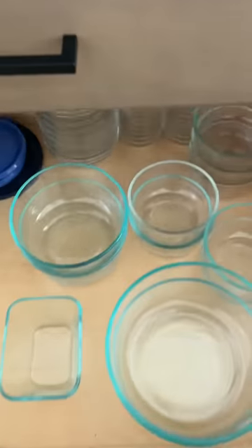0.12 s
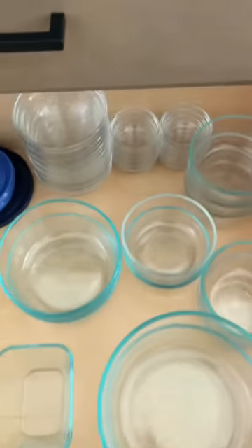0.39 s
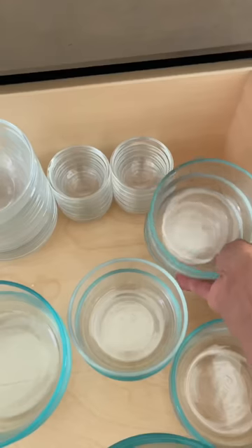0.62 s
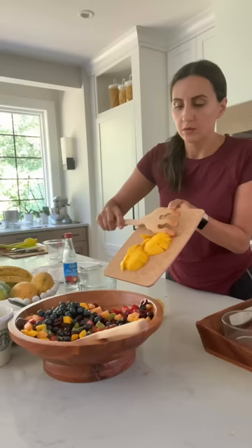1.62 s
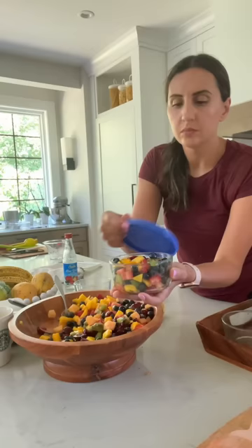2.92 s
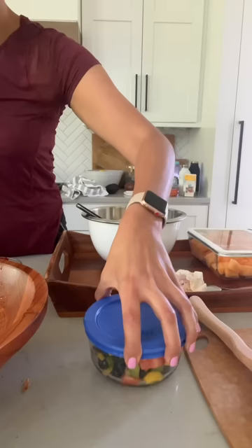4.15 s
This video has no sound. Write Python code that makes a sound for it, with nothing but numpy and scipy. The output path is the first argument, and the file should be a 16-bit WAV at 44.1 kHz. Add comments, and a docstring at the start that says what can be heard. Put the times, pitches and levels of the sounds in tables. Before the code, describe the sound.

A wooden drawer rolls and judders open with glass bowls clinking inside, food is poured and stirred in a bowl, then a plastic lid snaps shut.

```python
"""Kitchen drawer, bowl and lid

A kitchen heard on a phone with two microphone ports, in short takes butted together over appliance hum.
A wooden drawer rolls further off; then one is pulled, its box judders and glass bowls ring in it.
Food, made of dense noise grains, is poured into a bowl and stirred; single taps ring the full bowl.
A plastic lid snaps shut catch by catch on a hard counter, from short noise bursts into resonances.
Knocks, food and snaps excite a noise-built room tail, cut where the next take begins."""
import sys
import numpy as np
from scipy import signal
from scipy.fft import rfft, irfft
from scipy.io import wavfile

SR = 44100
rng = np.random.default_rng(int(sys.argv[2]) if len(sys.argv) > 2 else 0)


def level_to_linear(level):
    """Convert decibel levels to linear amplitude factors, elementwise."""
    exponent = np.asarray(level, float) / 20
    return 10 ** exponent


def dump_mix(stems):
    """Bounce the given channels to the path in sys.argv[1] as a 16-bit WAV at rate SR."""
    frames = np.atleast_2d(stems).T  # one column per channel
    limited = np.clip(frames, -1, 1)  # hard clip at full scale
    pcm = np.round(limited * 32767).astype(np.int16)
    wavfile.write(sys.argv[1], SR, pcm)


N = 255339
T = np.arange(N) / SR
# where one take ends and the next begins: t/s
TAKE_EDGES = [0, .541, 1.631, 2.131, 2.74, 4.184, 4.712, 5.237, 5.737, 5.79]


def level(x, db):
    """Scale to an rms level."""
    return x * level_to_linear(db) / np.sqrt(np.mean(x ** 2))


def gain(shape, lo_hz, hi_hz, size):
    """Gain per frequency bin from (f/Hz, level/dB) points, kept between two edges."""
    f = np.maximum(np.fft.rfftfreq(size, 1 / SR), 1)
    hz, db = np.transpose(shape)
    curve = level_to_linear(np.interp(np.log(f), np.log(hz), db))
    return curve / (1 + (lo_hz / f) ** 8) / (1 + (f / hi_hz) ** 8)


def noise(shape, lo_hz=20, hi_hz=17000, size=N):
    """Noise of unit rms with a given spectrum."""
    spectrum = rfft(rng.standard_normal(size)) * gain(shape, lo_hz, hi_hz, size)
    return level(irfft(spectrum, size), 0)


def ring(x, modes):
    """Sum of decaying resonances (f/Hz, level/dB, t60/s) driven by x."""
    out = 0
    for hz, db, t60 in modes:
        pole = np.exp(2j * np.pi * hz / SR - np.log(1000) / (max(t60, .004) * SR))
        out = out + level_to_linear(db) * signal.lfilter([1], [1, -pole], x).imag
    return out


def curves(rows):
    """Columns of (t/s, ..) rows over time, and a gate that is open inside the table."""
    s, *cols = np.transpose(rows)
    gate = (T >= s[0]) * (T < s[-1])
    return [np.interp(T, s, c) for c in cols] + [gate]


def grains(rate, spread_db, ms):
    """Random contacts, rate per second, with a heavy tail of sizes: an envelope of unit rms."""
    hits = (rng.random(N) < rate / SR) * level_to_linear(spread_db * rng.exponential(size=N))
    return level(signal.lfilter([1], [1, -np.exp(-1000 / (ms * SR))], hits), 0)


def burst(ms, rise_ms, size=8192):
    """Contact envelope: quick rise, exponential fall."""
    t = np.arange(size) / SR * 1000
    return (1 - np.exp(-t / rise_ms)) * np.exp(-t / ms)


def white_hit(ms, rise_ms):
    """White noise in a contact envelope, to drive resonances."""
    return rng.standard_normal(8192) * burst(ms, rise_ms)


def colour_hit(shape, ms, rise_ms, lo_hz=20, hi_hz=17000):
    """Coloured noise in a contact envelope, heard directly."""
    return noise(shape, lo_hz, hi_hz, size=8192) * burst(ms, rise_ms)


def pan(db):
    """Left and right gains, db apart; positive leans left."""
    return level_to_linear(np.array([[db], [-db]]) / 2)


def add(out, s, x, db, pan_db=0):
    """Place a sound whose first 20 ms have the given rms."""
    i = int(s * SR)
    x = (x * level_to_linear(db) / np.sqrt(np.mean(x[:882] ** 2)))[:N - i]
    out[:, i:i + len(x)] += x * pan(pan_db)


# room air of the earlier and the later takes: f/Hz, relative level/dB
EARLY_AIR = [(15, -57), (25, -21), (49, 0.5), (157, -3.5), (242, -13), (270, -5.5), (363, -26), (575, -15),
             (1130, -43.5), (1330, -43.5), (2690, -45), (6560, -41), (9840, -58.5), (13200, -40.5),
             (16000, -41.5)]
LATE_AIR = [(15, -59.5), (25, -42), (42, -17.5), (108, -20.5), (145, -13), (270, -24), (301, -25.5),
            (427, -25.5), (591, -40.5), (775, -36), (936, -52), (6050, -61.5), (9070, -72.5), (14400, -61),
            (16000, -85.5)]
# appliance hum of the earlier and the later takes: f/Hz, level/dB rms, width/Hz
EARLY_HUM = [(60.5, -59.5, 14), (114.4, -67, 14), (272.96, -62.5, 18)]
LATE_HUM = [(55.9, -53.5, 7.9), (261.2, -63, 19)]


def background(shape, air_db, lines):
    """Room air, with treble that differs between the sides, and hum lines of narrow wavering noise."""
    hum = 0
    for hz, db, width in lines:
        hum = hum + level(ring(rng.standard_normal(N), [(hz, 0, 2.2 / width)]), db)
    side = level_to_linear(air_db - 7) * noise(shape, 270) * np.array([[1], [-1]])
    return level_to_linear(air_db) * noise(shape) + hum + side


def appliance_tone():
    """A steady appliance tone of one sine whose strength wavers a little."""
    hz, db, waver_share = 106, -53, 0.18
    waver = 1 + waver_share * noise([(1, 0.01), (60, 0.000042)], 2, 20)
    return level_to_linear(db) * np.sqrt(2) * waver * np.sin(2 * np.pi * hz * T)


# decay of the kitchen: f/Hz, t60/s
ROOM_DECAY = [(100, 0.23), (300, 0.3), (1000, 0.911), (2000, 0.45), (4000, 0.45), (8000, 0.24),
              (15000, 0.17)]
# colour of the room tail: f/Hz, relative level/dB
ROOM_COLOUR = [(60, 1), (300, 3.5), (800, -2), (2000, 1), (5000, -2), (12000, -5)]
ROOM_ALIKE_HZ = 700  # well below this both sides hear nearly the same tail


def room():
    """Left and right tails of a hard kitchen: decaying noise bands, the top treble shortest."""
    t, out = np.arange(SR // 2) / SR, 0
    decay_hz, decay_s = np.transpose(ROOM_DECAY)
    colour_hz, colour_db = np.transpose(ROOM_COLOUR)
    flat = [(20, 0), (20000, 0)]
    for hz in 60 * 2 ** np.arange(0, 8.1, .5):
        t60 = np.interp(np.log(hz), np.log(decay_hz), decay_s)
        db = np.interp(np.log(hz), np.log(colour_hz), colour_db)
        mid, side = (noise(flat, hz / 2 ** .3, hz * 2 ** .3, size=len(t)) for _ in range(2))
        width = min(hz / ROOM_ALIKE_HZ, 1.3)
        band = (mid + side * width * np.array([[1], [-1]])) * 10 ** (-3 * t / t60)
        out = out + level_to_linear(db) * band * np.sqrt(hz / t60)
    out = out * np.clip((t - .004) / 0.0096, 0, 1)  # the first walls answer after a few ms
    return out / np.sqrt(np.sum(out ** 2) / 2)


# colour of the tail of a clack: f/Hz, relative level/dB
CLACK_COLOUR = [(530, -56), (900, -14.5), (1020, -10.5), (1150, -19), (1220, -12), (1390, 3), (1520, -14),
                (1860, -3.5), (1980, -7.5), (2050, -14), (2680, -19), (3100, -26.5), (4000, -21.5),
                (5200, -67), (8800, -120)]


def clack_tail():
    """The room tail alone of a clack just before a cut: noise independent on the two sides."""
    db, t60 = -53, 0.659
    start, end = TAKE_EDGES[3], TAKE_EDGES[4]
    both = np.array([noise(CLACK_COLOUR, 963, 3340) for _ in range(2)])
    gate = (T >= start) * (T < end)
    return level_to_linear(db) * both * gate * 10 ** (-3 * np.abs(T - start) / t60)


# the far drawer, for its rumble and its hiss: level at the start/dB, slows from t/s, fall after it/dB per s
FAR_ROLL = dict(rumble=(-45, 0.153, 20.4), hiss=(-55, 0.123, 35.5))
# colour of the far drawer: f/Hz, relative level/dB
FAR_ROLL_COLOUR = [(24, -34), (40, -7), (211, -0.5), (401, -2), (582, -12), (659, -5), (1060, -16),
                   (1460, -14), (3830, -34), (4910, -34.5), (5850, -46.5), (8070, -40), (10100, -59.5),
                   (12300, -42.5), (15000, -71.5)]


def far_drawer():
    """A drawer rolling further off, then slowing: rumble and hiss that fade at their own rates."""
    fades = {}
    for part, (db, s, rate) in FAR_ROLL.items():
        fades[part] = (T < TAKE_EDGES[1]) * level_to_linear(db - rate * np.maximum(T - s, 0))
    rumble = fades["rumble"] * noise(FAR_ROLL_COLOUR, 34.9, 997)
    return rumble + fades["hiss"] * noise(FAR_ROLL_COLOUR, 732)


# food poured into the bowl: t/s, flow level/dB before the rub's trim, hiss over the flow/dB
POUR_FLOW = [(1.631, -50, -16.5), (1.635, -51, -14.5), (1.755, -51, 7), (1.935, -45.5, -5),
             (1.951, -36.5, -7), (1.973, -49, -11), (2.029, -52.5, -1.65), (2.1, -74.5, 3),
             (2.131, -85, 5.5)]
# spoon through the food: peak t/s, level/dB before the rub's trim, time to fall 20 dB/s,
# hiss over it/dB, top over it/dB
SPOON_STROKES = [(2.75, -66.5, 0.0748, 1, -2), (2.81, -75, 0.02, -9.5, 5), (2.956, -55.5, 0.0073, 9, -11.5),
                 (2.998, -44.5, 0.0891, -7.5, -30), (3.13, -64.5, 0.3259, -4.5, -11.5),
                 (3.19, -47, 0.1494, -7.5, -16.5), (3.407, -73.5, 0.1072, 4, 6.5),
                 (3.56, -78, .12, 0.37, 7.5), (3.697, -66.5, 0.136, -12.5, -2),
                 (3.834, -72, 0.03, -11.5, -15), (3.903, -54.5, 0.0113, -15, -4.5),
                 (4.1, -74.5, 0.68, -3, -14)]


def pour_and_strokes():
    """Low, hiss and top gains of the pour and of every spoon stroke, which swells faster than it fades."""
    top_over_hiss_db, rise_share = -8.5, 0.288  # rise time as a share of the fall
    flow, bright, gate = curves(POUR_FLOW)
    out = gate * level_to_linear(np.array([flow, flow + bright, flow + bright + top_over_hiss_db]))
    stirring = (T >= TAKE_EDGES[4]) * (T < TAKE_EDGES[5])
    for s, db, fall, hiss, top in SPOON_STROKES:
        shape = db - 20 * np.maximum(T - s, (s - T) / rise_share) / fall
        out = out + stirring * level_to_linear(shape + np.array([[0], [hiss], [top]]))
    return out


# colour of damp food and of its taps: f/Hz, relative level/dB
FOOD_COLOUR = [(240, -35), (400, 3.5), (505, -8.5), (590, -3), (744, -7), (817, -5.5), (1240, -12),
               (1380, -11), (3150, -13), (3680, -7.5), (4040, -13), (6440, -11), (9200, -36.5),
               (14200, -14.5), (16300, -30.5)]


def food_rub():
    """Damp pieces rub and tumble: dense contact grains roughen three bands of noise."""
    low, hiss, top = pour_and_strokes()
    rub = level(1 + 0.275 * grains(220, 4, 1.7), -6.0)
    body = low * noise(FOOD_COLOUR, 471, 2510)
    return rub * (body + hiss * noise(FOOD_COLOUR, 2240, 9330) + top * noise(FOOD_COLOUR, 10000))


# pieces and spoon tapping the bowl: t/s, low, middle and high level/dB before trims, tink f/Hz
BOWL_TAPS = [(1.7035, -77.5, -54, -54, 6040), (1.7894, -66, -51.5, -48.5, 3600),
             (1.951, -55.5, -47, -50.5, 5582), (2.7487, -66, -66.5, -68, 3420),
             (2.7686, -55.5, -75, -65.5, 5100), (2.9238, -65, -72, -79, 4860),
             (2.9552, -42, -46, -50.5, 3842), (2.9866, -44, -48.5, -51, 3980),
             (3.0044, -63, -58.5, -50.5, 3120), (3.0494, -76.5, -56, -64.5, 2680),
             (3.0984, -71.5, -60, -62, 5200), (3.1294, -68.5, -66, -64, 5190),
             (3.1824, -51, -48, -50.5, 2574), (3.1926, -47.5, -64, -41.5, 2930),
             (3.2479, -52, -49, -47, 2745), (3.6601, -76, -83.5, -74.5, 5041),
             (3.901, -78, -68.5, -60.5, 5070)]
# soft bumps of the spoon handle: t/s, level/dB, f/Hz
HANDLE_BUMPS = [(3.6995, -66.5, 941), (3.8355, -61, 626), (3.85, -69, 700)]
# modes of the full bowl: f/Hz, level/dB, t60/s
FULL_BOWL_MODES = [(808.8, 0.5, 0.212), (1370.5, -3.5, 0.121), (2254, -3.5, 0.16), (5190, -4, .14)]


def food_taps():
    """Single pieces and the spoon tap the bowl: noise ticks, a short tink and the ring of the full bowl."""
    out = np.zeros((2, N))
    for s, low, mid, high, hz in BOWL_TAPS:
        add(out, s, colour_hit(EARLY_AIR, 13, 0.15, 156.4, 495), low - 2)
        add(out, s, colour_hit(FOOD_COLOUR, 22.7, .4, 845, 2680), mid - 8)
        add(out, s, colour_hit(FOOD_COLOUR, 2.38, 0.12, 2260), high - 8)
        add(out, s, ring(burst(0.035, 0.013), [(hz, 0, .018)]), high - 11)
        add(out, s, ring(burst(0.08, 0.033), FULL_BOWL_MODES), mid - 6)
    for s, db, hz in HANDLE_BUMPS:
        add(out, s, ring(burst(.4, 0.31), [(hz, 0, .03), (1.4 * hz, -6, .02)]), db)
    return out


def drone(hz, db):
    """A wavering low tone whose pitch moves along its own curve."""
    waver = 1 + .45 * noise([(1, 0.0016), (60, 0.00087)], 4.1, 44)
    return np.sqrt(2) * level_to_linear(db) * waver * np.sin(2 * np.pi * np.cumsum(hz) / SR)


# the drawer is pulled: t/s, judder of the box/dB before its trim, drone of the bottom f/Hz, drone level/dB
DRAWER_PULL = [(0.541, -46, 186, -48), (0.563, -49, 188.9, -31), (0.613, -41.5, 188.8, -34),
               (0.659, -41, 186, -42), (0.705, -44.5, 240.9, -43.5), (0.748, -42.5, 210.3, -58),
               (0.756, -25.5, 191.1, -31.5), (0.838, -34.5, 189.5, -33.5), (0.864, -30, 199.2, -38),
               (0.935, -37.5, 193.5, -41), (1.086, -34, 235.3, -35.5), (1.13, -29.5, 209.3, -38),
               (1.188, -21, 200.1, -29), (1.236, -25, 199.3, -33.5), (1.262, -30.5, 202.9, -43.5),
               (1.3, -30.5, 200, -32.5), (1.344, -36.5, 191.7, -43), (1.404, -28.5, 186, -39),
               (1.44, -37.5, 186, -39), (1.478, -40.5, 186, -39), (1.51, -56, 187.3, -44.5),
               (1.62, -55, 203.8, -64.5), (1.631, -70, 205.2, -70.5)]
# modes of the wooden box: f/Hz, level/dB, t60/s
BOX_MODES = [(116.7, -10.5, 0.29), (144.53, -11, 0.24), (186, -3.5, 0.39), (232.5, 4, 0.09),
             (265.06, -0.5, 0.21), (328, 4, 0.031), (397.5, 2.5, 0.045), (453, 1.5, 0.063),
             (597, -13, 0.058), (635.5, -15, 0.13)]
# colour of the scrape: f/Hz, relative level/dB
SCRAPE_COLOUR = [(290, -34.5), (500, -2), (740, -2.5), (1080, -23.5), (1260, -8), (1980, -22),
                 (2130, -12.5), (2770, -24), (5310, -23), (6060, -39), (7980, -26), (9220, -40),
                 (10100, -64.5), (11600, -33), (16000, -55)]
# buzzing of a nested stack of bowls: f/Hz, level/dB, t60/s
STACK_MODES = [(1310, -5, .15), (3330, 0.5, 0.081), (5306, -1.5, .12), (8050, -3, 0.05)]


def drawer_slide():
    """Runners judder the wooden box, its bottom drones, the runners scrape and the bowls chatter."""
    drag, hz, drone_db, gate = curves(DRAWER_PULL)
    # scrape and chatter grow more slowly than the judder, and die away as the drawer halts
    halt_s, halt_db_per_s = 1.44, 117
    halt = halt_db_per_s * np.maximum(T - halt_s, 0)
    scrape = gate * level_to_linear(-55.5 + 0.65 * (drag + 40) - halt)
    chatter = gate * level_to_linear(-65.5 + .4 * (drag + 40) - halt)
    roughness = 1 + 0.89 * grains(72, 0.82, 8)
    judder = level(ring(rng.standard_normal(N) * roughness, BOX_MODES), -2.9)
    glass = level(ring(grains(900, 2.1, .3) * rng.standard_normal(N), STACK_MODES), 0.5)
    slide = gate * level_to_linear(drag) * judder + scrape * noise(SCRAPE_COLOUR, 650, 3800)
    return slide + chatter * (noise(SCRAPE_COLOUR, 2700) + glass) + gate * drone(hz, drone_db)


# bowls knocking together: t/s, thud in the wood, body and clink level/dB before trims, thud f/Hz
BOWL_KNOCKS = [(0.547, -37, -56, -81.5, 186), (0.7526, -20.5, -31.5, -31.5, 194),
               (0.8542, -20, -24, -33, 328), (0.8864, -21.5, -27, -28, 258),
               (0.9587, -34, -35.5, -49.5, 231), (0.9831, -28.5, -34.5, -53.5, 231),
               (1.0636, -36, -48, -50, 238), (1.1074, -30.5, -30, -29.5, 393),
               (1.1389, -27, -33.5, -35.5, 469), (1.1724, -17, -30, -30.5, 418),
               (1.1904, -22, -28, -31, 488), (1.2221, -32, -27.5, -21, 421), (1.2484, -24, -45, -43, 415),
               (1.513, -65, -66, -67, 186), (1.5554, -48.5, -66, -77.5, 205.5)]
# which bowl rings at each knock: index into BOWL_MODES
KNOCKED_BOWL = [0, 0, 1, 1, 1, 1, 0, 2, 1, 0, 1, 3, 2, 0, 2]
# modes of each bowl, before they split: f/Hz, level/dB, t60/s before shortening
BOWL_MODES = [
    [(1261, -12, .08), (1763, -4, 0.094), (3207, -4.5, 0.083), (4441, -14.5, .06), (5200, 7.5, 0.099),
     (5446, 2, 0.14), (8086, -13, 0.052), (8430, -8.5, 0.045), (11700, -17.5, 0.066), (13330, -26, .06)],
    [(741, 0, 0.025), (995, 0, 0.063), (1447, -2, 0.047), (3680, -14.5, 0.18), (4400, -14.5, .06),
     (4830, -2, .08), (8300, -11.5, 0.03), (7580, -1, 0.031), (7960, -7, 0.052), (13750, -25, 0.066)],
    [(1287, -4.5, 0.017), (1510, 0.5, .05), (3063, 2.5, 0.072), (3670, -17.5, .05), (4860, 1, .04),
     (7908, -18, .05), (11464, -16, .05)],
    [(1024, -7, 0.12), (1284, -5, .06), (3130, -17, 0.076), (3600, -11.5, 0.058), (5700, -19.5, .06),
     (7740, -1, 0.063), (7390, -9.5, .07), (8570, -5.5, 0.044), (11410, -16, 0.18), (13710, -21.5, 0.053)],
]
# colour of the contact: f/Hz, relative level/dB
CONTACT_COLOUR = [(350, -34.5), (600, 6.5), (1540, -8), (2710, -20), (3110, -14.5), (3430, -11.5),
                  (5330, -10), (6120, -27), (7960, -4), (8890, -10.5), (10600, -57.5), (11400, -22.5),
                  (13800, -19.5), (15700, -30.5), (16300, -44.5)]


def bowl_knocks():
    """Two bowls knock: a rim rattles for a few ms and rings the glass, and the wood thuds."""
    out = np.zeros((2, N))
    for (s, thud, body, clink, knock_hz), k in zip(BOWL_KNOCKS, KNOCKED_BOWL):
        pairs = []  # every mode splits into a close pair
        for (hz, db, t60), (g, h) in zip(BOWL_MODES[k], rng.standard_normal((10, 2))):
            for detune in (1, 1 + 0.018 * h):
                pairs.append((hz * detune, db + 4.0 * g, .8 * t60))
        bell = ring(white_hit(13, 0.93), pairs)
        low = signal.sosfilt(signal.butter(4, 2650, "low", fs=SR, output="sos"), bell)
        high = signal.sosfilt(signal.butter(4, 2650, "high", fs=SR, output="sos"), bell)
        wood = [(hz, db, .5 * t60) for hz, db, t60 in BOX_MODES] + [(knock_hz, 5, .15)]
        add(out, s, ring(white_hit(3.5, 1.6), wood), thud - 4)
        add(out, s, low, body - 6)
        add(out, s, high, clink - 11)
        add(out, s, colour_hit(CONTACT_COLOUR, 11, 0.49, 650, 3800), body - 2)  # broad knock
        add(out, s, colour_hit(CONTACT_COLOUR, 6.1, 0.44, 2700), clink - 7)
        add(out, s, colour_hit(CONTACT_COLOUR, 1.0, 0.13, 1800), clink - 13)  # first tick
    return out


# lid catches snapping: t/s, then lid ring, counter thump, air pocket and tick level/dB before trims
LID_SNAPS = [(4.2222, -1.5, -28, -14, -25.5), (4.445, -10, -35.5, -19, -33.5),
             (5.0113, -21, -33.5, -43.5, -30), (5.016, -29.5, -37, -26, -42.5),
             (5.022, -10.5, -45, -31, -52.5), (5.505, -30.5, -37, -41, -42),
             (5.518, -36, -33, -28.5, -44.5)]
# modes of the lid: f/Hz, level/dB, t60/s
LID_MODES = [(470, 5, 0.05), (770, 8.5, 0.025), (1062.7, -2, 0.075), (1389.6, 4, 0.034), (1742, -1, .03),
             (1988.6, 6, .03), (2960, -10, .015), (3420, -27, .015), (4044, -62, .015)]
# modes of the counter: f/Hz, level/dB, t60/s
COUNTER_MODES = [(86.1, -15, 0.15), (130.6, -11, 0.065), (230, -4.5, 0.074), (346.6, -0.5, 0.025)]
# colour of the catch ticking over the rim: f/Hz, relative level/dB
TICK_COLOUR = [(240, -37.5), (400, -0.5), (780, 14.5), (1050, 6), (2070, -19), (2350, -41.5), (2960, -1),
               (3250, -18.5), (3860, -16), (5200, -25), (6750, -36), (7180, -22), (9340, -67.5),
               (10600, -47.5), (14400, -39.5), (16300, -54)]
# colour of what a snap sends round the room: f/Hz, relative level/dB
SNAP_SPREAD = [(180, -46), (300, -14), (441, -7.5), (487, -14), (836, -4.5), (1100, -8.5), (1360, -6.5),
               (1480, -2), (1900, -4), (2120, 0.5), (2400, -11), (2720, -15), (2920, -16.5), (4810, -21),
               (7270, -29.5), (8260, -77), (9000, -80), (10400, -80), (11500, -47), (14500, -47),
               (16000, -70)]
# sends to the room by source: level/dB
ROOM_SEND = dict(drawer=-17, food=-9, thump=-11.5, lid=-12.5, tick=-16.5, ring=-18)


def lid():
    """Catches tick over the rim, ring the lid and its air pocket, thump the counter and pulse the room."""
    pan_db, pocket_hz = 1.5, 746
    out, send = np.zeros((2, N)), np.zeros((2, N))
    soft = signal.butter(6, 6500, fs=SR, output="sos")  # soft plastic rings little above this
    for s, wet, thump, body, tick in LID_SNAPS:
        add(out, s, colour_hit(TICK_COLOUR, 2.1, 0.2, 3500, 7000), tick - 8, pan_db)
        add(out, s, colour_hit(TICK_COLOUR, 2.7, 0.14, 15000), tick - 21, pan_db)
        # the plastic rattles as it seats
        add(out, s, colour_hit(TICK_COLOUR, 2.1, 0.52, 300, 2.7 * pocket_hz), body - 12, pan_db)
        plastic = ring(white_hit(4.2, 0.44), LID_MODES)
        add(out, s, signal.sosfilt(soft, plastic), wet - 18, pan_db)
        # trapped air pops
        add(out, s + 0.001012, ring(burst(0.16, .15), [(pocket_hz, 0, .04)]), body - 7, pan_db)
        # a faint swell of noise over the 20 ms before each snap
        swell = noise(SNAP_SPREAD, 1200, 4500, size=882) * burst(6, .5, size=882)
        add(out, s - .02, swell[::-1], wet - 37, pan_db)
        counter = ring(white_hit(7.4, 0.924), COUNTER_MODES)
        add(out, s + .002, signal.sosfilt(soft, counter), thump - 3)
        for lo_hz, hi_hz, db in ((50, 550, thump + ROOM_SEND["thump"]),
                                 (550, 4100, wet - 12 + ROOM_SEND["lid"]),
                                 (2650, 32000, tick + ROOM_SEND["tick"])):
            pulse = np.roll(irfft(gain(SNAP_SPREAD, lo_hz, hi_hz, 882)), 441)  # smooth, centred on the snap
            add(send, s - .01, pulse, db)
    return out, send + level_to_linear(ROOM_SEND["ring"]) * out


def ports(x, side):
    """Add the quarter-cycle side signal of two microphone ports a short way apart."""
    mid = x.mean(0) if x.ndim > 1 else x
    return x + irfft(1j * rfft(mid) * gain(side, 20, 20000, N), N) * np.array([[1], [-1]])


# side signal from the lag between the ports, by source: f/Hz, level over mid/dB
PORT_SIDE = dict(drawer=[(60, -27), (110, -26), (200, -22), (380, -8), (700, -4.5), (1290, -15), (2380, 0),
             (4400, 3), (8120, -5.5), (15000, 1.5)], food=[(60, -20), (110, -13), (200, -20.5),
             (380, -10.5), (700, -9.5), (1290, -5.5), (2380, 2.5), (4400, -22.5), (8120, 15), (15000, -10)],
             lid=[(60, -12), (110, -26), (200, -21), (380, -25), (700, -17), (1290, -1.5), (2380, 1.5),
             (4400, -11), (8120, 5.5), (15000, -9.5)])
# lean to the left of the drawer and of the earlier and later air: level/dB between the sides
LEAN = dict(drawer=-0.99, air=1.37, late_air=1.5)


def scene():
    """Sum the sources, give each take its own room tail and butt the takes together."""
    slide = drawer_slide() + far_drawer()
    knocks = bowl_knocks()
    food = food_taps() + food_rub()
    snaps, spread = lid()
    send = (level_to_linear(ROOM_SEND["drawer"]) * knocks + level_to_linear(ROOM_SEND["food"]) * food + spread).mean(0)
    out = ports(knocks + slide, PORT_SIDE["drawer"]) * pan(LEAN["drawer"])
    out = out + ports(food, PORT_SIDE["food"]) + ports(snaps, PORT_SIDE["lid"])
    for a, b in zip(TAKE_EDGES, TAKE_EDGES[1:]):
        i, j = int(a * SR), int(b * SR)
        out[:, i:j] += signal.fftconvolve(send[None, i:j], room(), axes=1)[:, :j - i]
    out += clack_tail()
    late = T >= TAKE_EDGES[5]
    out += late * appliance_tone()
    out += background(EARLY_AIR, -65, EARLY_HUM) * ~late * pan(LEAN["air"])
    return out + background(LATE_AIR, -60, LATE_HUM) * late * pan(LEAN["late_air"])


def band_limit(x):
    """A steep low-pass at the top of the band."""
    return signal.sosfilt(signal.butter(12, 16490, fs=SR, output="sos"), x)


def record(dry):
    """The phone drops the deep bass, rounds the loudest peaks and cuts the top."""
    low_hz, top_hz, drive = 73.7, 16200, .5
    mix = signal.sosfilt(signal.butter(3, low_hz, "high", fs=SR, output="sos"), dry)
    mix = np.tanh(drive * mix) / drive
    mix = signal.sosfilt(signal.ellip(8, .2, 70, top_hz, fs=SR, output="sos"), mix)
    return band_limit(mix)


dry = scene()
out = record(dry)
dump_mix(out)
```